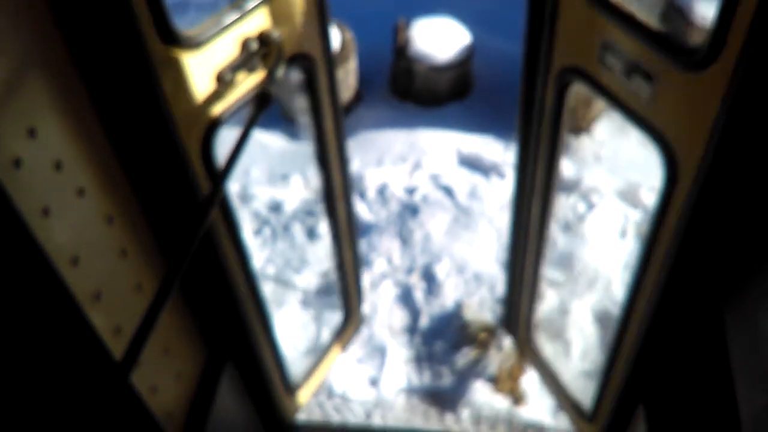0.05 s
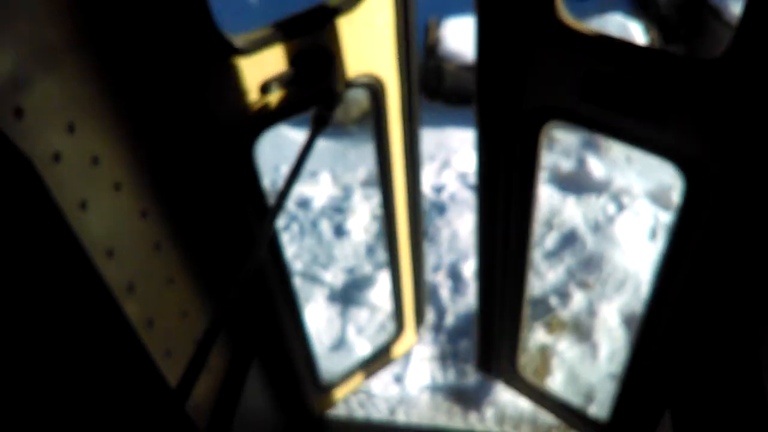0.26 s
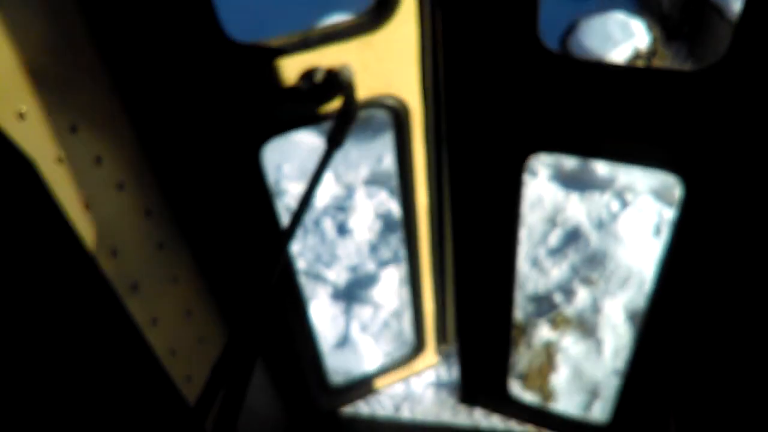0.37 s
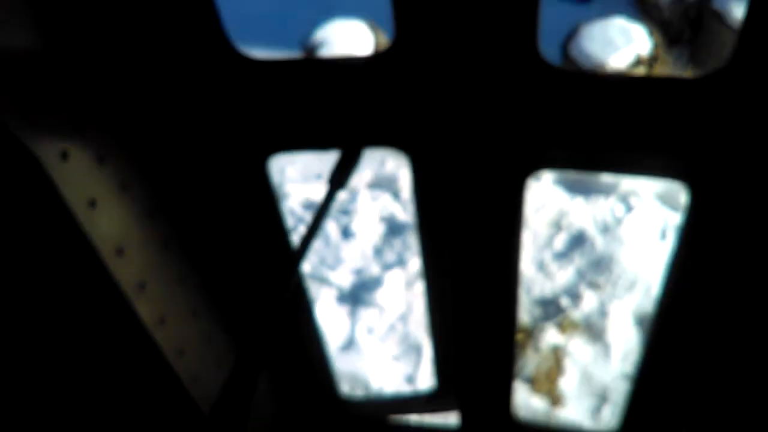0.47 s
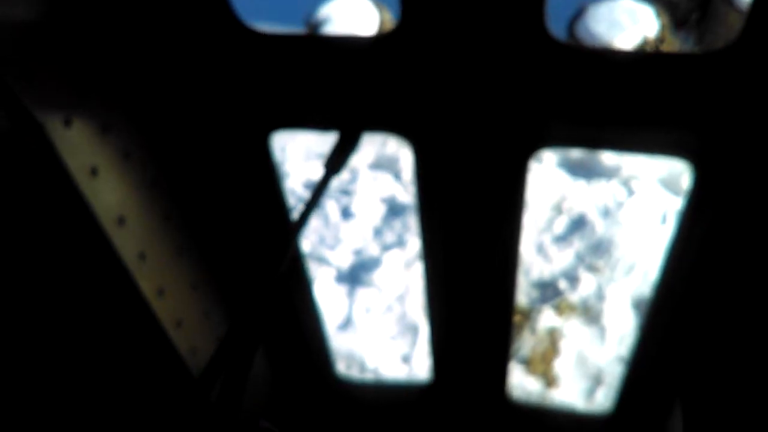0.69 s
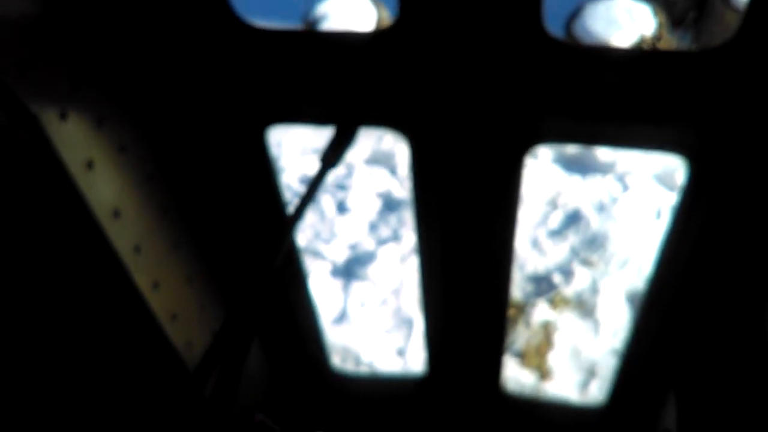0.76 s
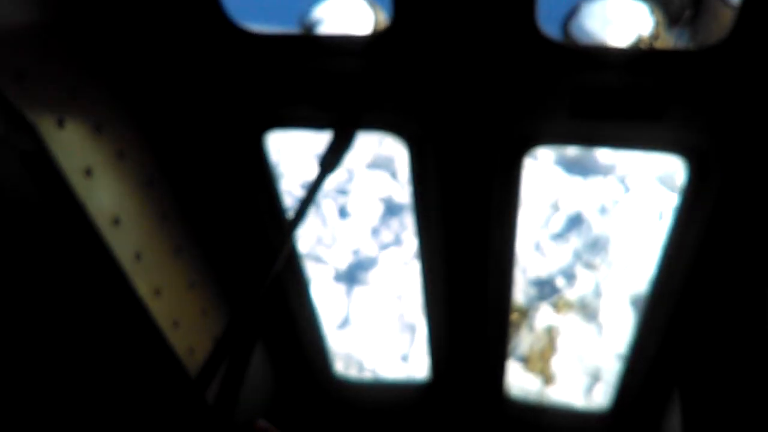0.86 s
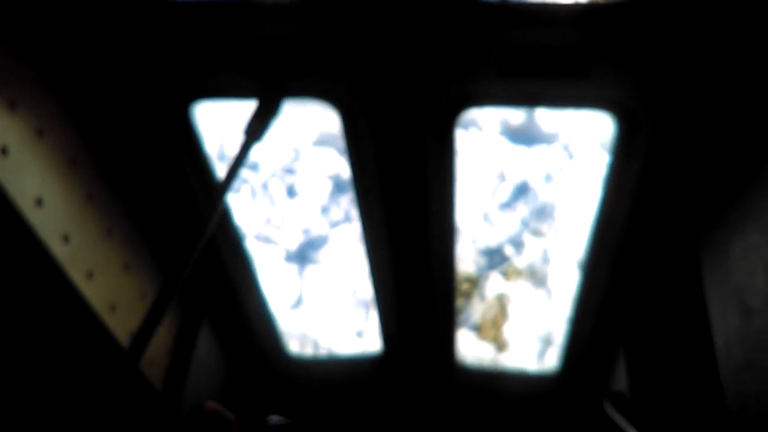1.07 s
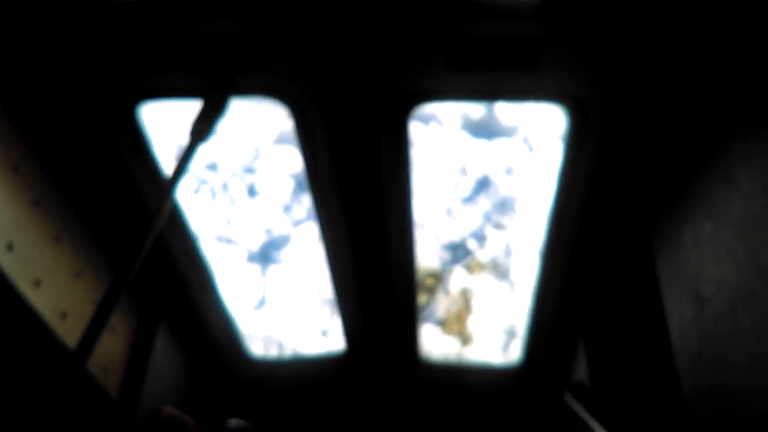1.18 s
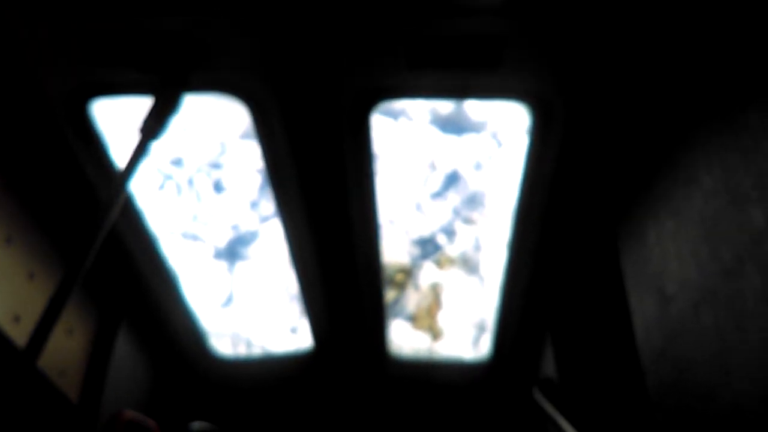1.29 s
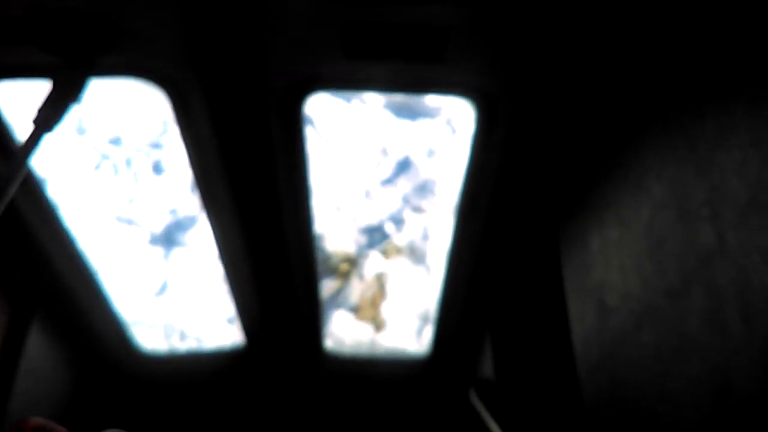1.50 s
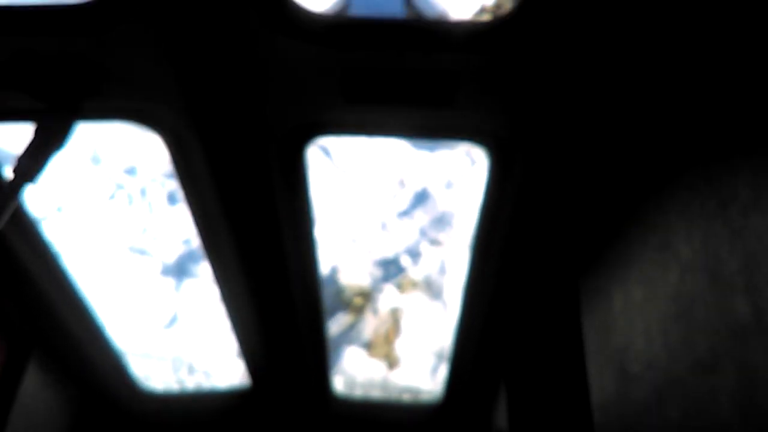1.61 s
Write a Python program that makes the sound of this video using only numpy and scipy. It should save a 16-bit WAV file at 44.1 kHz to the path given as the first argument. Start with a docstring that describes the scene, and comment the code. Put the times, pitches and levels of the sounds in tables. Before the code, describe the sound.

A folding bus door squeals and scrapes shut with a thud, heard from inside.

```python
"""Dry pivots squeal as a folding bus door swings shut, heard from inside the cabin.
Their stick-slip tones, mostly falling, ride on the gritty scrape of the guide in its track.
The leaves start with a hiss, shudder and thud home, leaving a thin steel ring.
Then come a double tap on the right microphone port, a soft rustle and a few small knocks,
all over a low cabin rumble."""
import sys
import numpy as np
from scipy import signal
from scipy.fft import rfft, irfft
from scipy.io import wavfile

SR = 44100
rng = np.random.default_rng(int(sys.argv[2]) if len(sys.argv) > 2 else 0)


def bounce(signal):
    """Save signal as a 16-bit WAV file at the path given by the first command-line argument."""
    frames = np.transpose(np.atleast_2d(signal))
    limited = np.clip(frames, -1, 1)
    pcm = np.round(limited * 32767).astype(np.int16)
    wavfile.write(sys.argv[1], SR, pcm)


N = 72765
TIME = np.arange(N) / SR

# contour of the guide's scrape and of the squeaks it sheds: (time [s], relative level [dB])
SCRAPE_CONTOUR = [(0.1, -73), (0.13, -73.5), (0.244, -39), (0.444, -30), (0.522, -38), (0.558, -34.5),
                  (0.584, -43.5), (0.59, -37), (0.654, -49), (0.67, -36), (0.95, -86.5)]


def pivot_squeals(echo):
    """Pivots and rubber seals catch and slip in short squeals that jump from pitch to pitch."""
    # (start [s], length [s], first pitch [Hz], last pitch [Hz], relative level [dB],
    #  loss per overtone [dB], pitch roughness [share], left over right [dB])
    grips = [(0.032, 0.047, 975, 950, -36.5, 25.5, 0.01, -5.5),
             (0.062, 0.097, 2260, 2345, -46.5, 25, 0.0065, 2),
             (.195, 0.1, 2360, 2290, -32.5, 18.5, 0.014, -8.5),
             (0.24, 0.032, 2600, 2900, -43.5, 18, 0.0064, 0),
             (.24, .07, 13250, 13220, -16, 40, 0.0004, 10.5), (0.23, 0.049, 1030, 1000, -41, 1, .012, -3),
             (.225, 0.028, 3220, 3120, -35, 11, .01, 3), (.255, .035, 1285, 1300, -28, 6.5, .006, 1),
             (.335, 0.043, 600, 650, -32, 22.5, 0.02, -5), (.228, .035, 4480, 4400, -38, 15, .008, 6),
             (.27, .06, 6930, 6850, -30.5, 25, .005, 9), (.277, 0.047, 4860, 4650, -29.5, 13.5, 0.011, 7.5),
             (.28, 0.077, 2290, 2270, -36, 3, .008, 7), (.285, .065, 2190, 2145, -28, 7.5, 0.0076, -1),
             (.293, .035, 3930, 3780, -23, 7, 0.0063, 11), (.325, .018, 3460, 3430, -20, 8, .008, 7),
             (.34, .024, 3435, 3425, -15.5, 9, .005, 5), (.365, .048, 3530, 3400, -21.5, 11.5, .014, 13.5),
             (.33, 0.053, 1880, 1795, -26.5, 5, 0.0073, 2), (.377, .027, 1940, 1950, -22, 18, .006, -7.5),
             (0.41, 0.041, 1785, 1720, -26, 12, .01, 5), (.378, .06, 5050, 4860, -27, 23.5, .016, 19),
             (0.33, .055, 2740, 2690, -37.5, 14.5, 0.017, -1), (0.41, .032, 3060, 2930, -28, 7, .012, 6.5),
             (.447, .021, 9735, 9745, -17, 40.5, .0018, 9), (.474, 0.025, 9770, 9765, -19, 39.5, .0018, 9),
             (0.51, .03, 1000, 1200, -33, 6.5, .012, 0), (.532, .022, 1030, 1000, -26, 17, .015, -3.5),
             (0.52, 0.014, 820, 1020, -27, 11, 0.019, 5.5), (.627, 0.0062, 600, 582, -23, 20, .02, -2),
             (.665, .02, 770, 635, -31, 17, 0.017, -1), (.6445, .008, 4780, 4660, -21, 8, .032, 13)]
    return sum(squeal(echo, *grip) for grip in grips)


def pivot_creak(echo):
    """One pivot drags in a long, sagging creak as the swing begins."""
    # creak contour: (time [s], pitch [Hz], relative level [dB])
    contour = [(0, 1404, -46), (.06, 1389, -41), (.11, 1357, -37), (.175, 1348, -34), (.205, 1342, -36),
               (.235, 1265, -42), (.25, 1275, -71.5)]
    # first three harmonics: (relative level [dB])
    harmonics_db = [-1, -2, -12]
    hz, db = in_time(contour)
    tone = stick_slip(hz, rough=.003, harmonics_db=harmonics_db)
    creak = tone * from_db(db - 1) * (TIME < contour[-1][0])
    return in_cabin(creak, echo, room_db=-6.5)[:, :N] * pan(7)


def squeal(echo, start, length, first_hz, last_hz, db, loss_db, rough, pan_db):
    """One grip of a dry contact: it catches, glides and lets go."""
    attack_s, release_s = min(.009, length / 3), .008
    t = np.arange(int((length + release_s) * SR)) / SR
    hz = np.interp(t, [0, length], [first_hz, last_hz])
    grip = np.clip(t / attack_s, 0, 1) * np.clip((length - t) / release_s + .5, 0, 1)
    tone = grip * stick_slip(hz, rough, [-k * loss_db for k in range(4)])
    heard = from_db(db) * in_cabin(tone, echo, room_db=-3) * pan(pan_db)
    return np.pad(heard, ((0, 0), (int(start * SR), N)))[:, :N]


def stick_slip(hz, rough, harmonics_db):
    """A friction tone whose period and strength waver."""
    # treble EQ on the harmonics: (frequency [Hz], gain [dB])
    eq = [(5000, -0.5), (7000, 1), (10300, 3), (11800, -1), (13200, -10), (16000, -8)]
    jitter_hz, flutter_hz, flutter_db = 170, 52, 2.3
    wavering_hz = hz * (1 + rough * drift(jitter_hz, len(hz)))
    phase = 2 * np.pi * np.cumsum(wavering_hz) / SR
    tone = sum(from_db(db + at_hz(eq, k * hz.mean())) * np.sin(k * phase)
               for k, db in enumerate(harmonics_db, 1) if k * hz.max() < SR / 2)
    flutter = rms_one(from_db(flutter_db * drift(flutter_hz, len(hz))))
    return np.sqrt(2) * tone * flutter


def guide_scrape():
    """The guide grinds along its track in a dense spray of grit."""
    # grit EQ: (frequency [Hz], gain [dB])
    eq = [(300, -15.5), (900, -2.5), (1500, -3.5), (2300, 4), (3200, -0.5), (5000, 4.5), (6500, -3),
          (8500, -2), (11000, -7), (13000, -17.5), (16000, -26.5)]
    grit = grains(per_s=2500, spread_db=1.5, room_db=1)
    return fader(SCRAPE_CONTOUR, trim_db=8.5) * colour(grit, eq)


def guide_squeaks(echo):
    """The guide sheds faint falling squeaks that follow the level of its scrape."""
    count, from_s, to_s, length_s = 30, .2, .45, .03
    low_hz, high_hz, sag = 2698, 8000, .04
    scrape_db, out = in_time(SCRAPE_CONTOUR)[0], 0
    for when, pitch, softness in rng.random((count, 3)):
        start = from_s + when * (to_s - from_s)
        hz = low_hz * (high_hz / low_hz) ** pitch
        db = np.interp(start, TIME, scrape_db) + 1 - 6 * softness
        out += squeal(echo, start, length_s, hz, hz * (1 - sag), db, loss_db=10.5, rough=.0083, pan_db=9)
    return out


def leaf_rattle():
    """The loose leaves shudder until the door is home."""
    # rattle contour: (time [s], relative level [dB])
    contour = [(0, -35.5), (.06, -39.5), (.156, -51), (.242, -41.5), (.32, -46), (.40, -48), (.47, -38),
               (.512, -24.5), (.55, -29.5), (.62, -30.5), (.68, -30), (.72, -37), (.8, -51.5), (.95, -75)]
    # bass-heavy EQ: (frequency [Hz], gain [dB])
    eq = [(15, -24), (32, -9), (80, 0.5), (130, 1.5), (200, 4), (400, -3.5), (650, 1), (1050, -5),
          (1400, -8.5), (3000, -27), (8000, -43)]
    contacts = grains(per_s=630, spread_db=3.5, room_db=-2)
    return fader(contour, trim_db=1.5) * colour(contacts, eq)


def leaf_bumps(echo):
    """The leaves hit the frame; each hit booms in the body and clacks in a panel."""
    # hits on the frame: (time [s], thud gain [dB], clack gain [dB])
    hits = [(.008, -47, -38), (.052, -48, -37), (.487, -30, -20.5), (.506, -22.5, -25.5),
            (.533, -23.5, -22.5), (.555, -27.5, -24), (.592, -24, -22), (.612, -26, -30), (.63, -23, -19),
            (.668, -30, -21), (.678, -23, -39), (.704, -17.5, -29)]
    # low modes of door and body: (frequency [Hz], relative level [dB], t60 [s])
    body_modes = [(38.7, -8.5, 0.86), (64.9, -10, .22), (76.5, -3, .25), (93, -6, .6), (101, -8, .22),
                  (121.2, -9, .27), (151, -11, .2), (179.7, -9, .18), (235.4, -12.5, .14),
                  (284.3, -14, .12)]
    # modes of a door panel: (frequency [Hz], relative level [dB], t60 [s])
    panel_modes = [(341.5, -9, 0.08), (560, -14, 0.033), (600, -6, 0.031), (653, -18.5, .09),
                   (804, -22.5, 0.13), (1003, -11, 0.059), (1950, -14.5, 0.021), (2480, -18.5, 0.034)]
    thud = clack = 0
    for start, thud_db, clack_db in hits:
        snap = decay(start, t60=.02) * band(rng.standard_normal((2, N)), 1300, 8000) * pan(6)
        thud += from_db(thud_db) * strike(start, body_modes, spread_db=2)
        clack += from_db(clack_db) * (strike(start, panel_modes, spread_db=3) + from_db(-13) * snap)
    return thud + in_cabin(clack, echo, room_db=-7)[:, :N]


def rod_ring():
    """A steel rod on the left is left ringing by the last high squeal."""
    # rod modes: (frequency [Hz], level [dB], t60 [s])
    modes = [(3210, -54, 0.95), (3835, -47, 1.0), (4538, -33, .25), (4650, -32, 0.358), (4650, -35, .22),
             (9496, -38, .16)]
    return strike(start=.646, modes=modes, spread_db=0) * pan(21)


def port_taps():
    """Taps on the right microphone port: dry pressure pulses, each with a faint tick."""
    # (time [s], peak [dB], top of the thump's band [Hz])
    taps = [(1.05, -32.5, 407), (1.07, -13, 954)]
    out = np.zeros((2, N))
    for start, db, top_hz in taps:
        click = -1.0 * (np.arange(N) == int(start * SR))
        muffle = signal.butter(2, .82 * top_hz, fs=SR, output="sos")
        thump = signal.sosfilt(muffle, band(click, 128, top_hz))
        tick = from_db(-29) * band(click, 2.7 * top_hz, 4.36 * top_hz)
        pulse = thump + tick
        out[1] += from_db(db) * pulse / np.abs(pulse).max()
    return out


def cabin_knocks():
    """Small dull knocks in the cabin, each a noise burst with a short tail."""
    # (time [s], peak [dB], rough band centre [Hz])
    knocks = [(.973, -48, 650), (1.453, -34, 1100), (1.454, -40, 400), (1.505, -38, 515), (1.508, -42, 220),
              (1.56, -48, 497)]
    out = 0
    for start, db, hz in knocks:
        burst = rng.standard_normal((2, N)) + rng.standard_normal(N)  # wide plus centred
        envelope = decay(start, t60=.025) + from_db(-13) * decay(start, t60=.22)
        knock = band(burst * envelope, hz * .6, hz * 1.25)
        out += from_db(db) * knock / np.abs(knock).max()
    return out


def door_hiss():
    """A short hiss as the door starts, sinking to a faint bed."""
    # hiss contour: (time [s], level [dB])
    contour = [(0, -30.5), (.04, -37), (.08, -43), (.14, -49), (.25, -61)]
    # hiss EQ: (frequency [Hz], gain [dB])
    eq = [(150, -6), (800, -8.5), (1800, -1), (3500, -9), (7000, -14), (11000, -18), (15000, -39)]
    return fader(contour) * noise(eq)


def close_rustle():
    """A soft, close rustle swells and ebbs once the door is shut."""
    # rustle contour: (time [s], relative level [dB])
    contour = [(.95, -73), (1.14, -68.5), (1.24, -59.5), (1.31, -52.5), (1.378, -68), (1.46, -60.5),
               (1.58, -68.5), (1.65, -56.5)]
    # rustle EQ: (frequency [Hz], gain [dB])
    eq = [(100, -1.5), (600, 6), (1300, -4), (3000, -3), (6000, -6.5), (10000, -5), (15000, -21.5)]
    return fader(contour, trim_db=4.5) * noise(eq)


def cabin_rumble():
    """A steady bed of low noise."""
    # rumble EQ: (frequency [Hz], gain [dB])
    eq = [(15, -22), (26, -8), (37, 1), (55, -7), (90, -8.5), (160, -18), (300, -22), (700, -29),
          (1500, -47), (6000, -55)]
    return from_db(-53) * noise(eq)


def cabin_echo():
    """Diffuse reflections of the cabin at each ear, the treble dying first."""
    predelay_s = .0047
    low = band(rng.standard_normal((2, N)), 110, 5900) * decay(predelay_s, t60=.35)
    high = band(rng.standard_normal((2, N)), 5000, 16000) * decay(predelay_s, t60=.28)
    return (low + high)[:, :SR // 2]


def in_cabin(x, echo, room_db):
    """A sound plus its reflections, set room_db relative to it."""
    x = np.atleast_2d(x)
    wet = signal.fftconvolve(x, echo, axes=1)
    direct = np.pad(x, ((0, 0), (0, echo.shape[1] - 1)))
    return direct + from_db(room_db) * wet * direct.std() / wet.std(axis=1, keepdims=True)


def strike(start, modes, spread_db):
    """One blow sets each mode ringing with a strength of its own."""
    return sum(from_db(db + spread_db * rng.uniform(-1, 1)) * decay(start, t60)
               * np.sin(2 * np.pi * hz * (TIME - start)) for hz, db, t60 in modes)


def grains(per_s, spread_db, room_db):
    """Random small contacts of uneven size; a noise wash stands for their reflections."""
    clicks = (rng.random((2, N)) < per_s / SR) * rng.choice([-1, 1], (2, N))
    sizes = from_db(spread_db * np.minimum(rng.exponential(1, (2, N)), 4))
    return rms_one(clicks * sizes) + from_db(room_db) * rng.standard_normal((2, N))


def colour(pair, eq):
    """Two unrelated signals become an equalised stereo field, narrow in the bass; rms 1."""
    # stereo balance: (frequency [Hz], left over right [dB])
    balance = [(60, 0.5), (500, -2.5), (1200, 1), (2500, 7.5), (5000, 13), (10000, 10.5), (15000, 8.5)]
    # likeness of the two sides: (frequency [Hz], correlation [0-1])
    likeness = [(50, 0.92), (150, 0.86), (350, 0.84), (800, 0.24), (1600, 0), (4000, 0.022), (10000, 0.04)]
    hz = np.arange(N + 1) * SR / (2 * N)
    mid, side = rfft(pair, 2 * N)
    alike = at_hz(likeness, hz)
    stereo = np.sqrt(1 + alike) * mid + np.sqrt(1 - alike) * side * [[1], [-1]]
    shaped = stereo * from_db(at_hz(eq, hz)) * pan(at_hz(balance, hz))
    return rms_one(irfft(shaped)[:, :N])


def noise(eq):
    """Smooth coloured stereo noise."""
    return colour(rng.standard_normal((2, N)), eq)


def drift(rate_hz, size):
    """Slow random wander with a spread of about 1, drawn at every tenth sample."""
    pole = np.exp(-20 * np.pi * rate_hz / SR)
    smoothed = signal.lfilter([1], [1, -2 * pole, pole * pole], rng.standard_normal(N // 5))
    settled = rms_one(smoothed[N // 10:])
    return np.interp(np.arange(size) / 10, np.arange(len(settled)), settled)


def band(x, low_hz, high_hz):
    """Gentle band-pass."""
    sos = signal.butter(2, [low_hz, high_hz], "band", fs=SR, output="sos")
    return signal.sosfilt(sos, x + 1e-18)


def decay(start, t60):
    """Envelope that opens at start and falls 60 dB every t60 seconds."""
    return (TIME >= start) * from_db(-60 * np.maximum(TIME - start, 0) / t60)


def fader(contour, trim_db=0):
    """Gain that rides a level contour."""
    return from_db(in_time(contour)[0] + trim_db)


def in_time(rows):
    """Join the rows of a contour by straight lines."""
    times, *columns = np.transpose(rows)
    return [np.interp(TIME, times, column) for column in columns]


def at_hz(points, hz):
    """Read a curve on a log-frequency axis."""
    frequencies, values = np.transpose(points)
    return np.interp(np.log(hz + 1e-9), np.log(frequencies), values)


def pan(db):
    """Constant-power gains, left over right by db."""
    gains = from_db(np.array([[.5], [-.5]]) * db)
    return gains / np.sqrt(np.mean(gains ** 2, axis=0))


def from_db(db):
    """Decibels to gain."""
    return 10 ** (np.asarray(db) / 20)


def rms_one(x):
    """Scale to rms 1."""
    return x / np.sqrt(np.mean(x ** 2) + 1e-20)


def scene():
    """Mix the door, the small close sounds and the cabin bed."""
    echo = cabin_echo()
    friction = pivot_creak(echo) + pivot_squeals(echo) + guide_squeaks(echo)
    sliding = (guide_scrape() + leaf_rattle()) * np.interp(TIME, [.88, 1.0], [1, 0])
    impacts = leaf_bumps(echo) + rod_ring() + cabin_knocks() + port_taps()
    return friction + sliding + impacts + door_hiss() + close_rustle() + cabin_rumble()


def record(dry):
    """A steep low-pass takes off the very top."""
    stop_hz = 16700
    return signal.sosfilt(signal.cheby2(12, 70, stop_hz, fs=SR, output="sos"), dry)


dry = scene()
out = record(dry)
bounce(out)
```